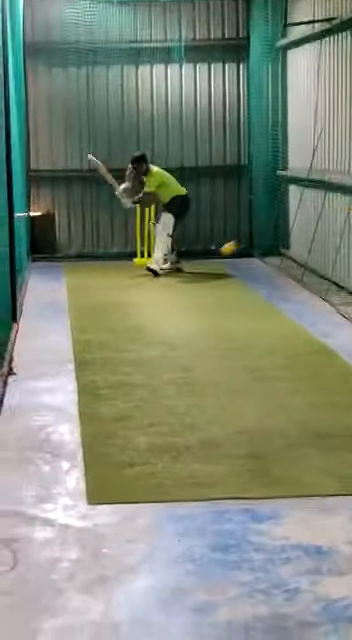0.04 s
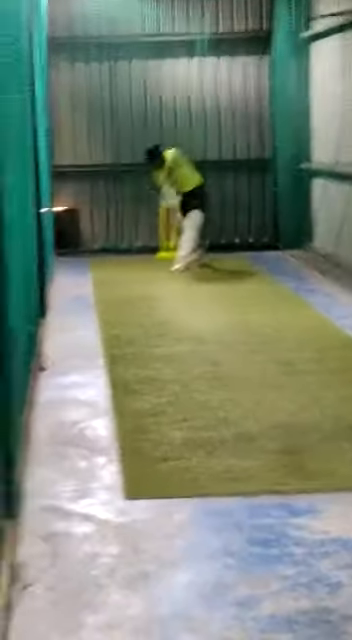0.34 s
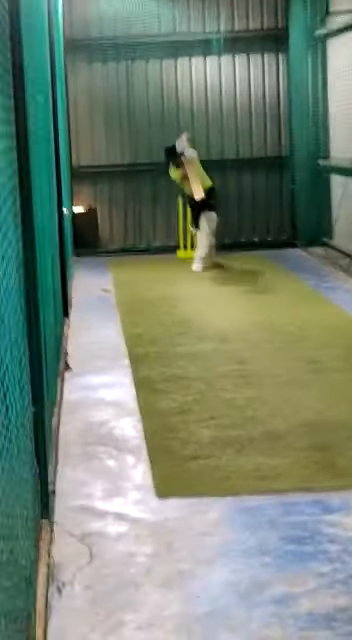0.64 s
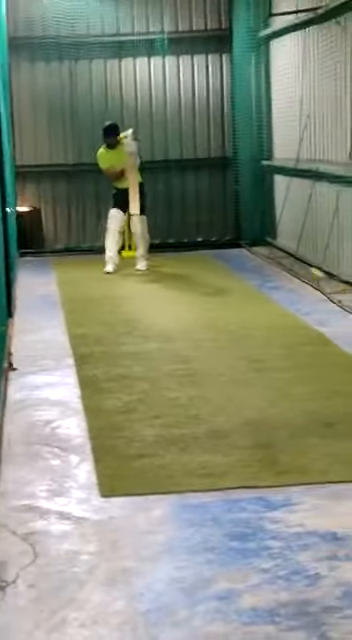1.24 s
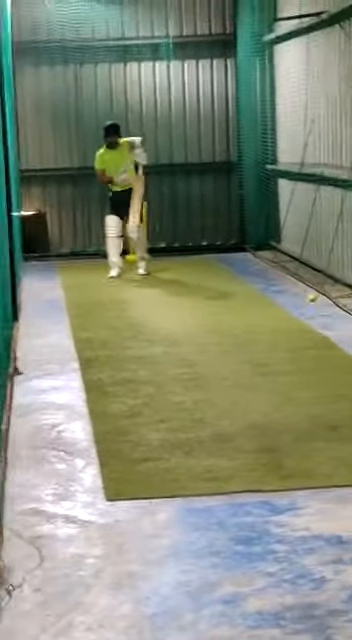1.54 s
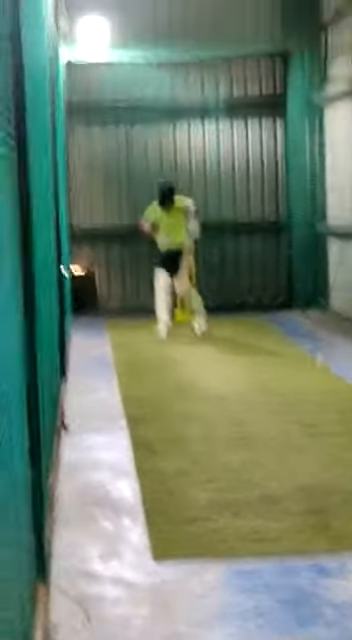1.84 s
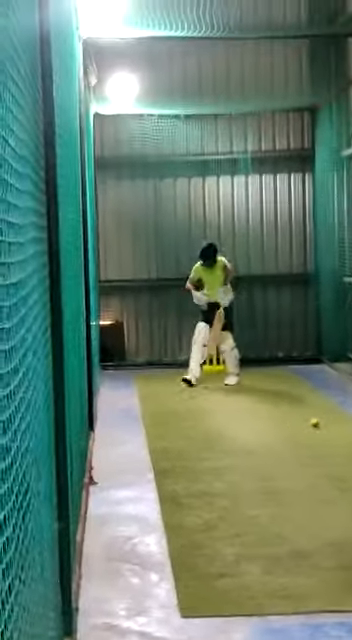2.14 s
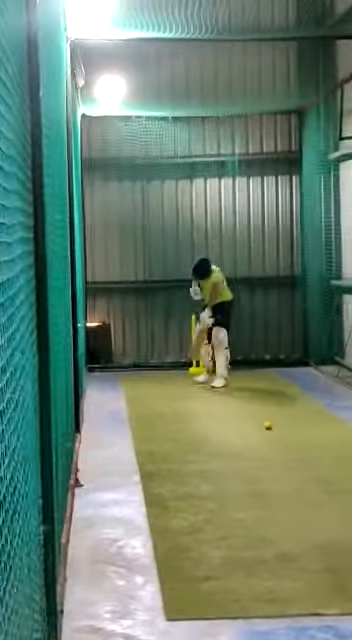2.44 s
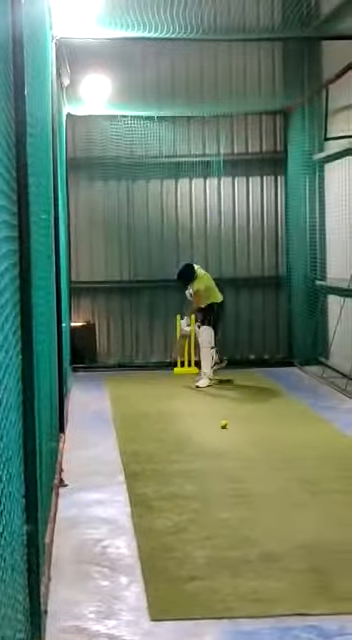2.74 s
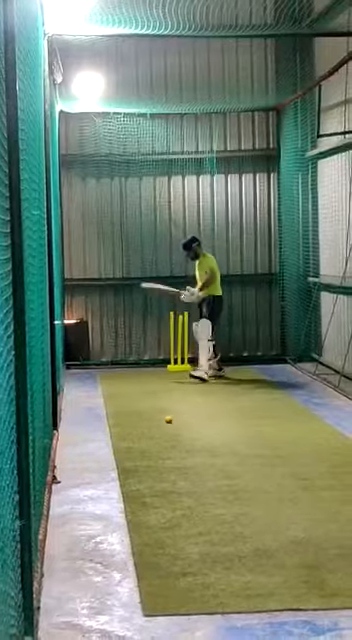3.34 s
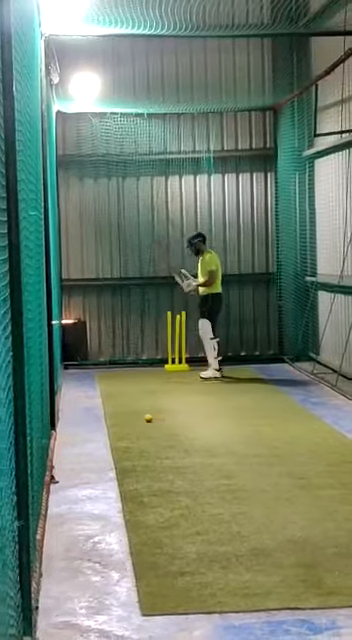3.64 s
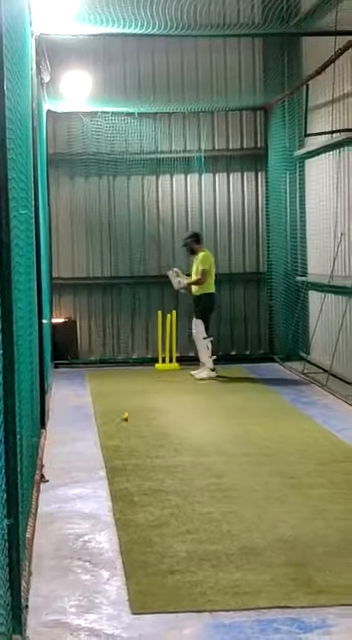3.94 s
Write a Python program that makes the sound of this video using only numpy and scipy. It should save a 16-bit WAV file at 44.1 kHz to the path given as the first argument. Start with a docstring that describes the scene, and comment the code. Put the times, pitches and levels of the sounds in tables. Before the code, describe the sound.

One loud crack of cricket bat on ball, with a long echo in indoor nets.

```python
"""A cricket bat cracks a ball once in an indoor net hall with walls of corrugated steel.
The wood rings briefly, the walls slap back and the hall rings on for seconds, while a limiter
turns the sound down and lets it back up. Feet and ball thud on the mat, and later the bat is tapped
on the ground. A motor's hum and a thin electrical whine sit under the hall's steady air noise."""
import sys
import numpy as np
from scipy import signal
from scipy.fft import rfft, irfft
from scipy.io import wavfile
from scipy.ndimage import uniform_filter1d, minimum_filter1d

SR = 44100
rng = np.random.default_rng(int(sys.argv[2]) if len(sys.argv) > 2 else 0)


def file_out(sig):
    """Save sig as 16-bit WAV at sys.argv[1]."""
    # one column per channel
    cols = np.atleast_2d(sig).T
    # limit, then scale
    lim = np.clip(cols, -1, 1)
    pcm = np.round(lim * 32767).astype(np.int16)
    wavfile.write(sys.argv[1], SR, pcm)


N = 176400
CUTOFF_HZ = 15750


def from_db(db):
    return 10 ** (np.asarray(db) / 20)


def rms_one(x):
    return x / np.sqrt(np.mean(x ** 2) + 1e-20)


def seconds():
    return np.arange(N) / SR


def bin_hz():
    return np.maximum(np.arange(N // 2 + 1) * SR / N, 1)


def at_hz(rows, hz):
    pitches, values = np.transpose(rows)
    return np.interp(np.log(hz), np.log(pitches), values)


def in_time(rows):
    times, *columns = np.transpose(rows)
    return [np.interp(seconds(), times, column) for column in columns]


def dying(fade_s):
    """A fade. Every fade time here is the time taken to fall by 60 dB."""
    return np.exp(-np.minimum(np.log(1000) * seconds() / fade_s, 60))


def rising(rise_s):
    return 1 - np.exp(-seconds() / rise_s)


def panned(db):
    return from_db(np.array([[.5], [-.5]]) * db)


def drift(rate_hz):
    """A smooth random wobble, about 1 in size."""
    return rms_one(irfft(rfft(rng.standard_normal(N)) / (1 + (bin_hz() / rate_hz) ** 2), N))


def delayed(x, s):
    lag = int(round(s * SR))
    return np.pad(x, ((0, 0), (max(lag, 0), max(-lag, 0))))[:, max(-lag, 0):][:, :N]


def convolve(a, b):
    return signal.fftconvolve(np.atleast_2d(a), b, axes=-1)[:, :N]


def dulled(x, cut_hz, order=1):
    return signal.sosfilt(signal.butter(order, cut_hz, fs=SR, output="sos"), x)


# How alike the two ears hear the hall. Each row: pitch in Hz, likeness (1 is the same, 0 unrelated).
EAR_LIKENESS = [(60, 0.87), (130, 1), (260, 0.91), (520, 0.56), (1000, 0.014), (2000, -0.02),
                (4000, -0.082), (12000, -0.036)]

def diffuse(colour, balance=None):
    """Noise from all sides, alike in both ears in the bass. Its colour says how strong each pitch is."""
    hz = bin_hz()
    mid, side = rfft(rng.standard_normal((2, N)))
    alike = np.clip(at_hz(EAR_LIKENESS, hz), -.99, .995)
    both = np.sqrt(1 + alike) * mid + np.sqrt(1 - alike) * side * [[1], [-1]]
    lean = panned(at_hz(balance, hz)) if balance else 1
    return rms_one(irfft(both * lean * from_db(at_hz(colour, hz)) * (hz < CUTOFF_HZ), N))


def panels():
    """The steel wall sheets favour some pitches, making narrow peaks and dips."""
    ripple_db, width_hz = 2, 14
    grid = np.arange(0, SR / 2, width_hz)
    return from_db(ripple_db * np.interp(bin_hz(), grid, rng.standard_normal(len(grid))))


# How long the hall rings. Each row: pitch in Hz, fade time in seconds.
HALL_FADES = [(100, 4.2), (250, 3.88), (600, 3.4), (1200, 4.74), (2400, 4.29), (4000, 3.17), (6000, 2.01),
              (9000, 0.98), (15000, 0.35)]
# Which way the echoes lean. Each row: pitch in Hz, left minus right in dB.
HALL_LEAN = [(200, 0), (600, 0.6), (1200, -1.1), (2500, -3.5), (5000, 1), (6800, -6.5), (8500, -16),
             (14000, -7.5)]

def hall(colour, ring_share=1):
    """The hall answers a blow with dense echoes, and the highest pitches die first."""
    spectrum = rfft(diffuse(colour, HALL_LEAN)) * panels()
    centres = np.geomspace(80, 16000, 16)
    place = np.interp(np.log(bin_hz()), np.log(centres), np.arange(len(centres)))
    echoes = 0
    for k, hz in enumerate(centres):
        band = irfft(spectrum * np.maximum(1 - abs(place - k), 0), N)
        echoes += band * dying(ring_share * at_hz(HALL_FADES, hz))
    return echoes * rising(.0038)


# The air noise. Each row: pitch in Hz, relative level in dB.
AIR_COLOUR = [(15, -57), (25, -15), (59, -13), (80, -8.5), (103, -12.5), (158, -10), (231, -17), (270, -14),
              (335, -16), (430, -23.5), (515, -20.5), (700, -15), (856, -16.5), (1150, -24.5),
              (1800, -27.5), (4150, -42.5), (6000, -47), (7300, -42.5), (9000, -48), (15000, -50.5)]

def air():
    """The hall's air makes a steady, low rush."""
    return from_db(-42.5) * diffuse(AIR_COLOUR)


# The echo of the bowler's delivery. Each row: pitch in Hz, relative level in dB.
DELIVERY_ECHO = [(60, -4), (110, 3.5), (200, 4.5), (400, 1), (750, -3.5), (1300, -9.5), (2500, -18.5),
                 (5600, -25.5), (6400, -29.5), (12000, -49)]

def delivery():
    """At the start, the hall is still ringing from the bowler's delivery."""
    return from_db(-30) * hall(DELIVERY_ECHO)


# The motor's speed. Each row: time in seconds, turns per second.
MOTOR_SPEED = [(0, 48.94), (1.5, 50.86), (2.4, 51.76), (3.3, 50.96), (4, 51.6)]
# Its hum. Each row: time in seconds, then levels in dB of the tones at 1, 2 and 3 times that speed.
MOTOR_LEVELS = [(0, -64, -57, -66), (.8, -59, -54, -70), (1.5, -45, -49.5, -56), (2.1, -54, -51, -47),
                (2.3, -56, -42.5, -62), (2.8, -55, -44.5, -54), (3.05, -59, -43.5, -47),
                (3.5, -56, -44.5, -50.5), (4, -71, -49, -50.5)]

def motor():
    """A distant motor hums three wavering tones that follow its slowly changing speed."""
    waver_db = 1.8
    angle = 2 * np.pi * np.cumsum(in_time(MOTOR_SPEED)[0]) / SR
    return sum(np.sqrt(2) * from_db(db + waver_db * drift(2.4)) * np.sin(multiple * angle)
               for multiple, db in enumerate(in_time(MOTOR_LEVELS), 1))


def whine(hz=15003, db=-82):
    """The electrics give off a thin, steady tone."""
    return np.sqrt(2) * from_db(db) * np.sin(2 * np.pi * hz * seconds())


# Feet and ball on the mat. Each row: start in seconds, relative level in dB, pitch in Hz,
# fade time in seconds.
MAT_THUDS = [(-.01, -36, 185, 0.13), (.025, -36.5, 251.4, 0.22), (.125, -42, 169.5, 0.3),
             (.29, -45, 232.6, 0.16), (.33, -34.5, 620, 0.0069), (2.11, -49.5, 148, 0.13),
             (2.93, -53, 151.5, 0.11)]
# The noise of a thud or tap on the mat. Each row: pitch in Hz, relative level in dB.
MAT_COLOUR = [(80, -22), (200, -2.5), (380, 4), (750, 5.5), (1050, 0.5), (1500, -16.5), (3000, -29),
              (8000, -64)]

def thuds():
    """Each soft blow is one fading tone, heard directly and through the hall."""
    room = hall(MAT_COLOUR, ring_share=.68)
    direct_db = 19.5
    out = 0
    for start, db, hz, fade_s in MAT_THUDS:
        blow = ring(hz, fade_s) * rising(.0096)   # the mat gives way softly
        boom = convolve(blow, room)
        boom /= np.std(boom[:, :SR // 10])
        out += from_db(db) * delayed(from_db(direct_db) * blow + boom, start)
    return out


def ring(hz, fade_s):
    return np.sin(2 * np.pi * hz * seconds()) * dying(fade_s)


# The tones of bat and ball. Each row: pitch in Hz, relative level in dB, fade time in seconds.
BAT_TONES = [(259, -14, 0.018), (338, -9, 0.039), (430, -10, 0.033), (603, -3, 0.028), (706, -9, 0.027),
             (1160, -17, 0.013), (2490, -3.5, 0.0076), (5530, -7.5, 0.016), (6050, -20, 0.027)]

def bat_ring():
    """Struck willow shakes briefly at several pitches of its own."""
    return sum(from_db(db) * ring(hz, fade_s) for hz, db, fade_s in BAT_TONES)


# The first echoes. Each row: delay in seconds, relative level in dB, left minus right in dB.
WALL_SLAPS = [(.003, -15.5, 3), (.0066, -14.5, -12), (.0333, -8.5, 8), (.076, -14.5, 0), (0.097, -13, 0),
              (.141, -12.5, -1), (0.166, -15, 3), (0.283, -16, -2)]

def wall_slaps(blow):
    """Floor and walls throw the blow back, and the ridges in the steel smear each slap."""
    scatter = rng.standard_normal((2, N))
    walls = np.zeros((2, N))
    for delay, db, pan_db in WALL_SLAPS:
        smear = np.roll(scatter, rng.integers(N), axis=1) * dying(.0068)
        smear = from_db(-5.5) * rms_one(smear) / np.sqrt(N)
        smear[:, 0] += 1   # the clean bounce
        walls += from_db(db) * panned(pan_db) * delayed(smear, delay)
    return dulled(convolve(blow, walls), cut_hz=2600)   # nets and mat soak up the highs


# The crack bouncing around the lane before it spreads. Each row: pitch in Hz, relative level in dB.
LANE_ECHO = [(110, -14), (150, 4), (205, -21), (320, 4), (560, 6.5), (850, -11), (1250, -3), (1700, -28),
             (2600, -11.5), (3800, -8), (5600, -13), (6400, -13), (7800, -19.5), (10000, -22.5),
             (15000, -42)]
# The crack as it fills the hall. Each row: pitch in Hz, relative level in dB.
CRACK_ECHO = [(50, -20), (105, -11.5), (150, -3.5), (210, -0.5), (310, -1), (560, -1), (780, 0), (1000, -5),
              (1250, -5), (1600, -6.5), (2500, -11), (3300, -15), (5500, -15), (6400, -21), (7600, -16.5),
              (9200, -28), (12500, -22), (15000, -20.5)]

def bat_crack(start_s=.437):
    """The ball snaps against the bat and rings it; the walls, the lane and the whole hall answer."""
    snap = dulled(rng.standard_normal((2, N)), cut_hz=6800)
    blow = from_db(-3.5) * snap * dying(.005) - bat_ring()
    bass_cut = signal.butter(2, 148, "high", fs=SR, output="sos")   # a bat is too small for deep bass
    blow = signal.sosfilt(bass_cut, blow)
    near = from_db(3) * (blow + wall_slaps(blow))
    lane = from_db(-16) * diffuse(LANE_ECHO) * dying(.88)
    far = from_db(-14) * hall(CRACK_ECHO)
    return delayed(near + lane + far, start_s)


# The sizzles just after the crack. Each row: start in seconds, level in dB.
SIZZLE_BURSTS = [(.4625, -19), (0.4695, -19)]
# Their hiss. Each row: pitch in Hz, relative level in dB.
SIZZLE_HISS = [(2000, -27), (5000, -12), (10000, -5), (12500, -15), (14500, 10)]

def sizzles():
    """The sharpest wall slaps bring short, bright bursts of hiss."""
    burst = diffuse(SIZZLE_HISS, HALL_LEAN) * dying(.031)
    return sum(from_db(db) * delayed(burst, start) for start, db in SIZZLE_BURSTS)


# The bat tapped on the ground. Each row: start in seconds, relative level in dB.
BAT_TAPS = [(3.241, -40), (3.267, -43), (3.288, -39.5), (3.385, -51), (3.47, -48.5), (3.615, -45.5)]

def bat_taps():
    """The tip of the bat knocks on the mat, which rings the wood and stirs the hall."""
    wood = from_db(9.5) * dulled(bat_ring(), cut_hz=910, order=4)   # the mat mutes the high tones
    thump = from_db(8) * diffuse(MAT_COLOUR) * dying(.088)
    knock = (wood + thump + hall(MAT_COLOUR, ring_share=.5)) * rising(.00088)
    return sum(from_db(db) * delayed(knock, start) for start, db in BAT_TAPS)


def scene():
    """All the sounds, added together."""
    return air() + delivery() + motor() + whine() + thuds() + bat_crack() + sizzles() + bat_taps()


def record(dry):
    """A limiter turns the crack down and recovers slowly; peaks are clipped and the top highs cut."""
    limit_db, recovery_db_per_s, look_ahead_s, ceiling = 3, 14, .0027, .72
    over_db = np.maximum(20 * np.log10(abs(dry).max(axis=0) + 1e-9) - limit_db, 0)
    recovery = recovery_db_per_s * seconds()
    dip_db = np.maximum.accumulate(over_db + recovery) - recovery
    span = int(look_ahead_s * SR)
    dip_db = uniform_filter1d(-minimum_filter1d(-dip_db, span), span)   # ease in just before the peak
    clipped = np.clip(dry * from_db(-dip_db), -ceiling, ceiling)
    return signal.sosfilt(signal.ellip(12, .1, 80, CUTOFF_HZ, fs=SR, output="sos"), clipped)


dry = scene()
out = record(dry)
file_out(out)
```